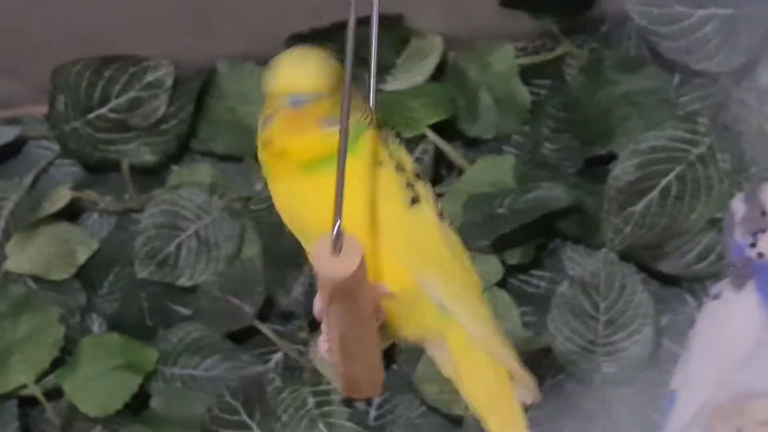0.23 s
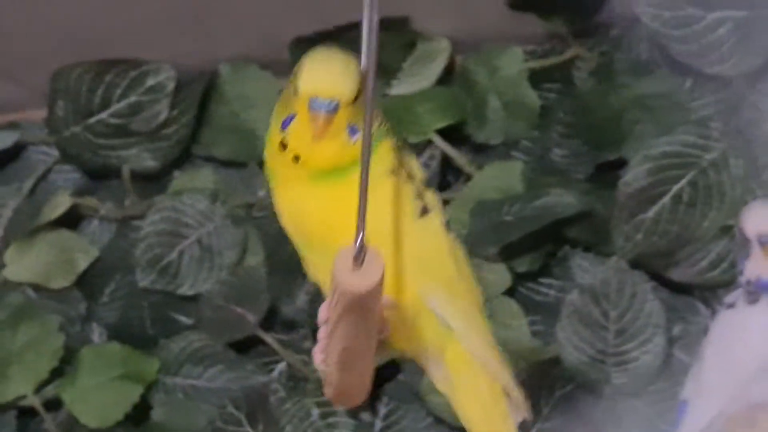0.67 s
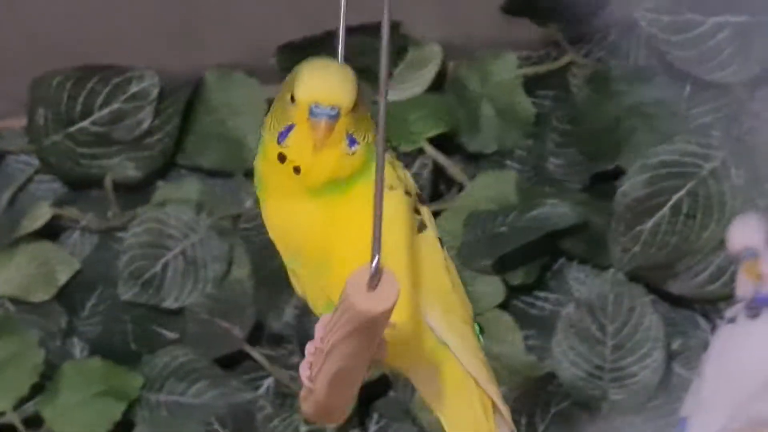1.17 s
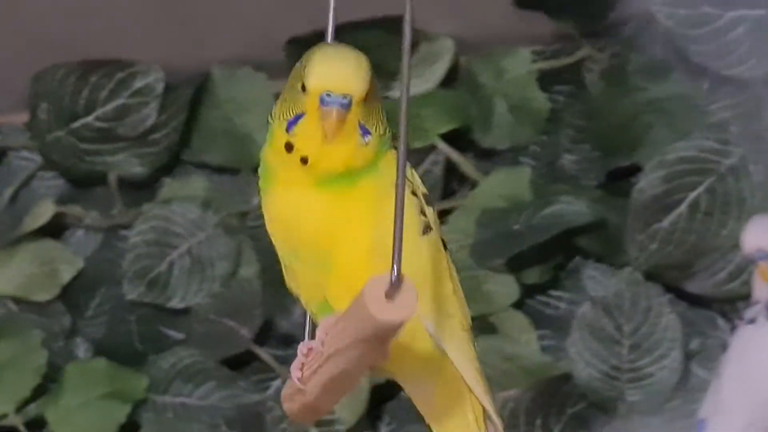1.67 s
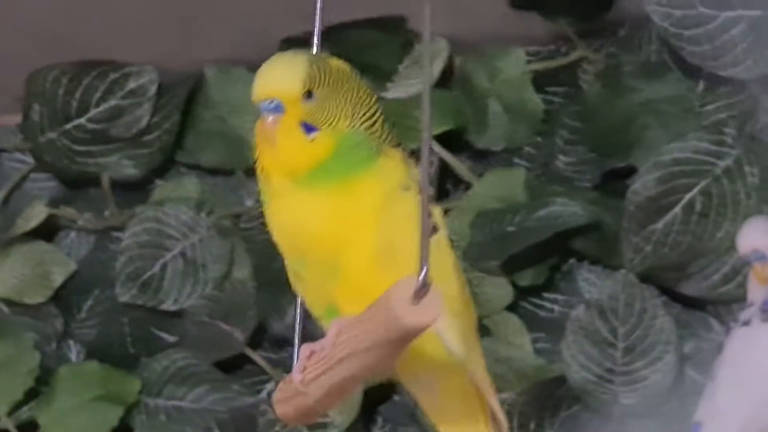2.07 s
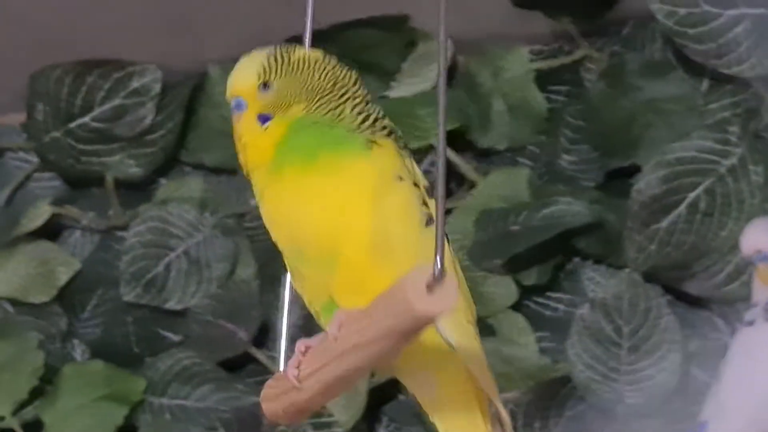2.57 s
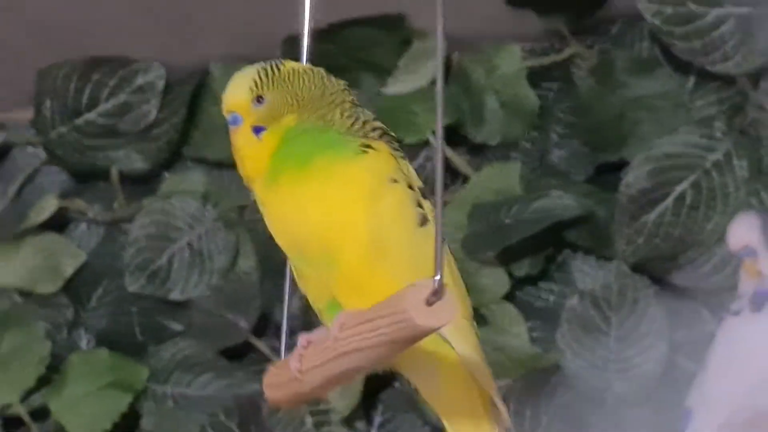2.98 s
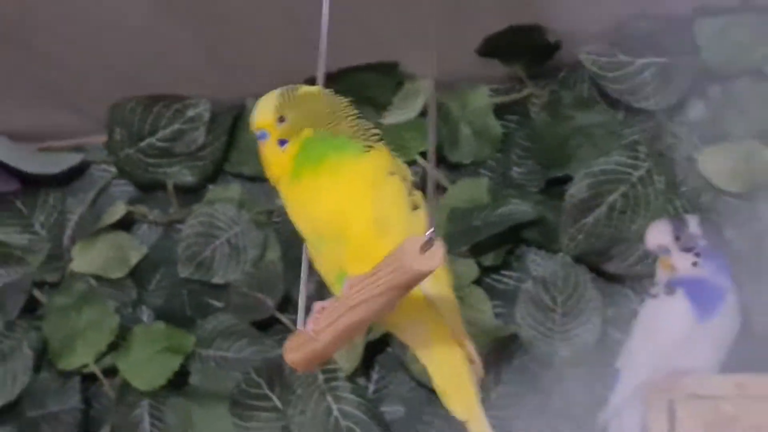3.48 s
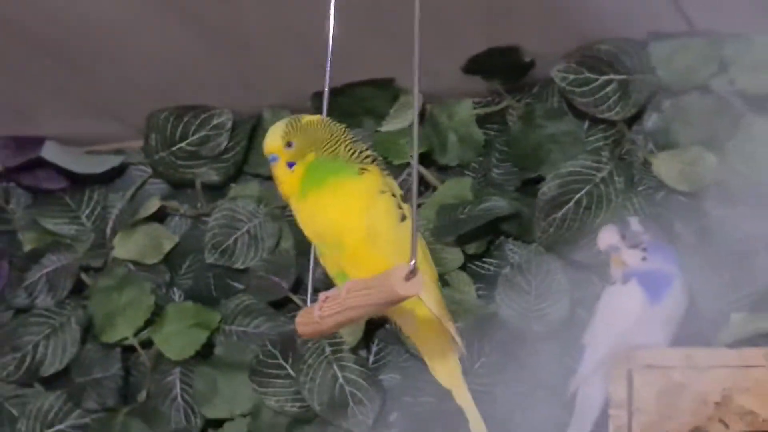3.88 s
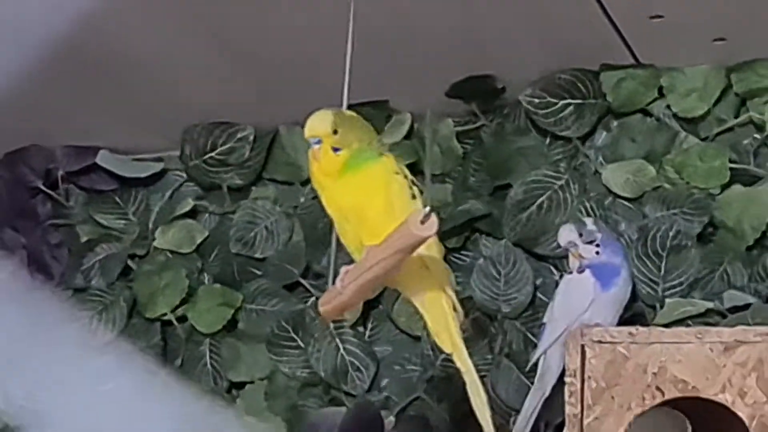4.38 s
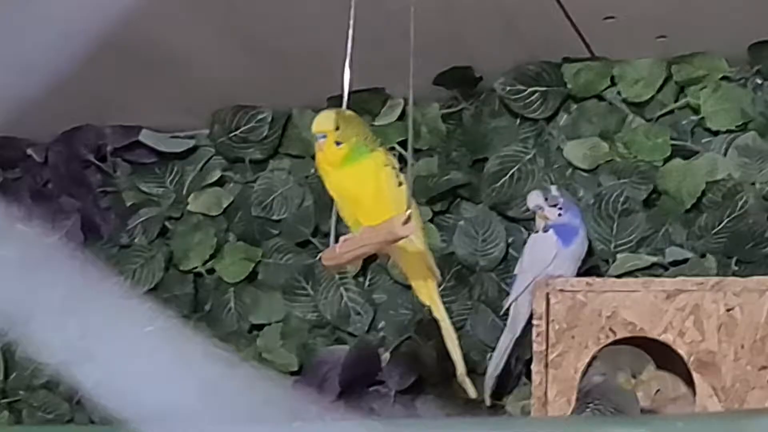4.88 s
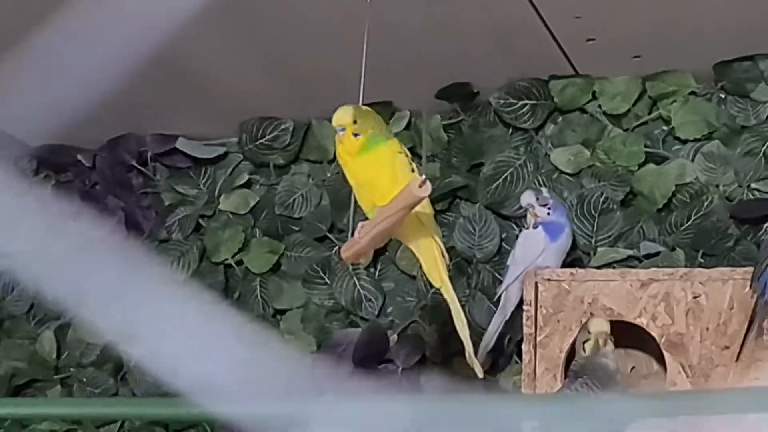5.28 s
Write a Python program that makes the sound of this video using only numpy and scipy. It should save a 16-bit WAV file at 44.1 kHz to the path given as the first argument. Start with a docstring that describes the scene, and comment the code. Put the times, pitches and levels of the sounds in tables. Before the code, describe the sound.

Budgies warble and rasp in short bursts, two piercing screeches standing out, over low hand thumps, faint hiss and feathery rustles.

```python
"""Parrots in a small aviary

Small parrots warble (gliding harmonic tones) and squawk (pulsed noise through throat resonances, with
whistles inside) in a small hard-walled aviary. Noise swells: feathers and feet brushing, a low puff
between squawks, a squawk's faint lingering hiss. A frame knock rings out, wire clinks. Handheld two-port
recorder: the right port hears the room; the covered left one gets mostly hand rumble and thumps."""
import sys
import numpy as np
from scipy import signal
from scipy.fft import rfft, irfft
from scipy.io import wavfile
from scipy.ndimage import uniform_filter1d, minimum_filter1d

SR = 44100
rng = np.random.default_rng(int(sys.argv[2]) if len(sys.argv) > 2 else 0)


def wrap_up_sound(samples):
    """Save the sound to the file named by the first command line argument, as 16-bit audio."""
    columns = np.atleast_2d(samples).T
    # keep every value between -1 and 1, then stretch to whole-number steps
    tamed = np.clip(columns, -1, 1)
    steps = np.round(tamed * 32767).astype(np.int16)
    wavfile.write(sys.argv[1], SR, steps)


N = 243873


def from_db(db):
    """Gain of a level in dB."""
    return 10 ** (np.asarray(db, float) / 20)


def rms_one(x):
    """Scale to rms 1."""
    return x / np.sqrt(np.mean(x ** 2) + 1e-20)


def in_time(rows):
    """Columns of a curve table at every sample."""
    time_s, *columns = np.transpose(rows)
    return [np.interp(np.arange(N) / SR, time_s, c) for c in columns]


def at_hz(points, hz, column=1):
    """A spectrum table read on a log-frequency axis."""
    points = np.array(points)
    return np.interp(np.log(hz + 1), np.log(points[:, 0]), points[:, column])


def band(x, low_hz, high_hz, order=2):
    """Butterworth band-pass."""
    return signal.sosfilt(signal.butter(order, [low_hz, high_hz], "band", fs=SR, output="sos"), x)


def drift(rate_hz):
    """Random drift of rms 1: noise twice through a one-pole low-pass."""
    r = np.exp(-2 * np.pi * rate_hz / SR)
    smooth = signal.lfilter([1], [1, -2 * r, r * r], rng.standard_normal(N + SR))
    return rms_one(smooth[SR:])   # skip the filter's start-up


def resonance(x, hz, width_hz):
    """Two-pole resonance with gain 1 on top."""
    r = np.exp(-np.pi * width_hz / SR)
    zeros = np.array([1, 0, -1]) * (1 - r * r) / 2
    return signal.lfilter(zeros, [1, -2 * r * np.cos(2 * np.pi * hz / SR), r * r], x)


# steady floor of each port, before the low cut: (frequency [Hz], level [dB per Hz])
LEFT_FLOOR = [(150, -100), (300, -104), (500, -108), (1000, -112), (2000, -114), (3500, -117), (5000, -122),
              (8000, -134), (10000, -128), (12000, -123), (15000, -123)]
RIGHT_FLOOR = [(150, -90.5), (300, -101), (500, -105), (1000, -110), (2000, -110), (3500, -115),
               (5000, -120), (8000, -124), (10000, -122), (12000, -120), (15000, -122)]


def hiss(spectrum):
    """Steady noise shaped to a level per Hz, with a low cut at 220 Hz."""
    hz = np.fft.rfftfreq(N, 1 / SR)
    low_cut = hz ** 2 / (hz ** 2 + 220. ** 2)
    gain = from_db(at_hz(spectrum, hz)) * np.sqrt(SR / 2) * low_cut
    return irfft(rfft(rng.standard_normal(N)) * gain, N)


def thump(contact_ms, hz, t60_s):
    """A push, rounded by the soft contact, after which the case swings back at its own low note; peak 1."""
    r, w = from_db(-60 / (t60_s * SR)), 2 * np.pi * hz / SR
    swing = signal.lfilter([1, -2, 1], [1, -2 * r * np.cos(w), r * r], np.ones(5000))
    pulse = signal.sosfilt(signal.butter(4, 1000 / contact_ms, fs=SR, output="sos"), swing)
    return pulse / np.abs(pulse).max()


# hand rumble in the case: (time [s], left level [dB], right level [dB])
RUMBLE_CURVE = [(0.0, -33.5, -41.5), (0.2, -45.5, -77), (0.33, -38, -47), (0.8, -41.5, -65),
                (1.0, -47, -60), (1.27, -40, -63), (1.46, -50, -65.5), (1.61, -42, -51.5),
                (1.8, -52.5, -73.5), (2.08, -39, -65.5), (2.24, -48.5, -68.5), (2.5, -36, -56.5),
                (2.9, -48, -62.5), (3.12, -44.5, -61.5), (3.5, -48.5, -67), (3.82, -39.5, -56),
                (4.2, -49.5, -70), (4.55, -43, -45), (4.95, -48.5, -61.5), (5.33, -44, -57),
                (5.53, -49, -60.5)]
# fingers shifting on the case:
# (time [s], peak [dB], push +1 or pull -1, port 0 left 1 right, contact [ms])
FINGER_THUMPS = [(0.227, -27, 1, 0, 4.3), (0.322, -28.5, -1, 0, 7), (0.349, -38, 1, 1, 1.7),
                 (0.351, -38, -1, 0, 6.5), (0.66, -19, 1, 0, 3.57), (0.677, -19.5, -1, 0, 8.3),
                 (0.752, -26, 1, 0, 11), (0.873, -48, 1, 1, 2.5), (1.103, -24.5, -1, 0, 5.8),
                 (1.593, -23.5, 1, 0, 9.2), (1.92, -20, -1, 0, 2.74), (2.058, -34, -1, 0, 4.8),
                 (2.065, -27.5, 1, 0, 11.3), (2.462, -27.5, 1, 0, 15.4), (2.541, -43.5, -1, 0, 2.7),
                 (2.575, -43.5, -1, 0, 3.5), (2.618, -34.5, 1, 0, 5), (2.652, -19.5, 1, 0, 5),
                 (2.685, -35, -1, 0, 3.6), (2.743, -22.5, 1, 0, 3.9), (2.87, -46, -1, 1, 2.47),
                 (2.996, -41, -1, 0, 5.5), (3.029, -25.5, -1, 0, 4.5), (3.056, -16, 1, 0, 4),
                 (3.088, -27.5, 1, 0, 4.3), (3.099, -34, 1, 0, 4.2), (3.121, -24.5, -1, 0, 3.8),
                 (3.335, -43, 1, 0, 3.7), (3.471, -37, -1, 0, 5.9), (3.678, -32.5, 1, 0, 3.2),
                 (3.775, -36.5, 1, 0, 2.2), (3.91, -55, -1, 1, 3.4), (3.92, -32, 1, 0, 6.2),
                 (3.964, -38, 1, 0, 5.1), (4.186, -50, -1, 1, 2.75), (4.342, -37.5, -1, 0, 5.2),
                 (4.367, -45, 1, 0, 5), (4.435, -38, 1, 0, 2.8), (4.541, -33, 1, 0, 2.7),
                 (4.541, -30, -1, 1, 2), (4.746, -45.5, 1, 1, 2.3), (4.833, -34.5, 1, 0, 5.5),
                 (5.068, -33.5, -1, 0, 3.91), (5.259, -38.5, -1, 1, 3.8), (5.367, -39, -1, 1, 2),
                 (5.506, -55, -1, 1, 2.5)]
# swing behind each port: (frequency [Hz], t60 [s])
CASE_SWING = [(65, .07), (170, 0.014)]


def hand():
    """Lumpy rumble of its own in each port, a scatter of faint knocks, and single thumps."""
    knocks_per_s, knock_db = 14, -13
    out = np.zeros((2, N))
    for port, (level_db, top_hz) in enumerate(zip(in_time(RUMBLE_CURVE), (72, 110))):
        deep = signal.sosfilt(signal.butter(4 - 2 * port, top_hz, fs=SR, output="sos"), rng.standard_normal(N))
        deep = signal.sosfilt(signal.butter(1, 25, "high", fs=SR, output="sos"), deep)
        lumpy = rms_one(deep) * from_db(0.83 * drift(3.8))
        strikes = (rng.random(N) < knocks_per_s / SR) * rng.standard_normal(N)
        contact_ms = 5.5 - 5.4 * port
        knocks = signal.fftconvolve(strikes, thump(contact_ms, *CASE_SWING[port]))[:N]
        out[port] = from_db(level_db) * (lumpy + from_db(knock_db) * knocks)
    for time_s, peak_db, push, port, contact_ms in FINGER_THUMPS:
        i, port = round(time_s * SR), round(port)
        pulse = thump(contact_ms, *CASE_SWING[port])[:N - i]
        out[port, i:i + len(pulse)] += np.sign(push) * from_db(peak_db) * pulse
    return out


# modes of the wooden frame, already ringing at the start:
# (frequency [Hz], mean level at 0 s [dB], t60 [s])
FRAME_MODES = [(87.3, -36, 0.52), (364, -43, 0.46), (476, -40, 0.28), (585, -43.5, 0.24)]


def knock():
    """Each mode of the frame dies away with a wavering level."""
    t = np.arange(N) / SR
    out = np.zeros(N)
    for hz, level_db, t60_s in FRAME_MODES:
        fall_db = level_db - 60 * t / t60_s + 4.7 * drift(31)
        out += from_db(fall_db) * np.sin(2 * np.pi * (hz * t + rng.random()))
    return out


# noise swells in the open port, before flutter: (peak time [s], fade before the band's share [dB/s],
# peak of the dull [dB], middle [dB], bright [dB] and airy [dB] bands)
SWELLS = [(0.013, 96, -60, -53, -55, -55.5), (0.04, 199, -48.5, -66, -59, -62),
          (0.075, 250, -63, -73, -57.5, -54), (0.13, 150, -78, -77, -59.5, -59),
          (0.202, 148, -53, -56, -59.5, -56), (0.233, 131, -46.5, -54.5, -61, -56.5),
          (1.65, 59.8, -84, -75.5, -65, -80), (2.15, 59.7, -77, -65, -76, -91),
          (2.298, 80, -52.5, -57, -64, -70), (2.9, 29.9, -74, -75, -86.5, -92),
          (3.095, 150, -73, -72, -71, -74), (3.245, 101, -68.5, -57.5, -69, -67),
          (3.898, 116, -55.5, -47, -68.5, -70), (3.95, 114, -59, -65, -80.5, -88),
          (4.29, 60.7, -68.5, -63, -72.5, -86.5), (4.419, 115, -46.5, -48.5, -57, -57),
          (4.545, 150, -47.5, -62.5, -58.5, -65), (4.6, 81, -56, -71.5, -71, -79.5),
          (4.66, 109, -56, -54, -58.5, -68), (4.75, 81, -60.5, -63, -72, -87.5),
          (4.87, 40, -64, -65, -66, -84), (4.925, 120.5, -60.5, -56, -59.5, -68),
          (5.0, 80, -58.5, -66.5, -69, -80), (5.05, 30, -65, -62, -69.5, -75),
          (5.2, 60, -66.5, -53, -77, -74), (5.3, 150, -73, -51, -76, -79),
          (5.41, 60, -61.5, -54.5, -63.5, -81), (5.47, 40, -52, -50, -61.5, -61),
          (5.51, 60.4, -52.5, -56, -61, -59)]
# noise bands: (low edge [Hz], high edge [Hz])
SWELL_EDGES = [(180, 795), (800, 2700), (4300, 9500), (9500, 14000)]
# hollow tone in each band: (frequency [Hz], width [Hz], gain [dB])
HOLLOW_TONES = [(374, 90, 1.5), (1270, 300, 1.5), (5200, 440, -0.5), (11900, 980, 1.5)]
# faint noise between the swells, one per band: level [dB]
REST_DB = [-79, -88, -95, -97]
RISE_DB_PER_S, FADE_SHARE = 700.5, [.7, 1.05, 1.5, 1.9]   # treble fades fastest


def noise_swells():
    """Feathers and feet, a low puff, a squawk's lingering hiss: four fluttering bands with hollow tones."""
    flutter, out, t = drift(35), np.zeros(N), np.arange(N) / SR
    for k, ((low_hz, high_hz), (hz, width_hz, tone_db)) in enumerate(zip(SWELL_EDGES, HOLLOW_TONES)):
        noise = band(rng.standard_normal(N), low_hz, high_hz, order=3)
        noise = rms_one(noise + from_db(tone_db) * resonance(noise, hz, width_hz))
        power = from_db(REST_DB[k]) ** 2
        for peak_s, fade_db_per_s, *band_db in SWELLS:
            slope = np.where(t < peak_s, RISE_DB_PER_S, -fade_db_per_s * FADE_SHARE[k])
            power = power + from_db(band_db[k] + slope * (t - peak_s)) ** 2
        flutter_db = 1.0 * flutter + 1.5 * drift(30)   # shared + the band's own
        out += noise * np.sqrt(power) * from_db(flutter_db)
    return out


# warbled notes, and the whistles heard inside squawks:
# (start [s], length [s], first pitch before scoop [Hz], last pitch [Hz], roughness [0-1],
# whistle level before throb [dB], second-harmonic level before throb and beak [dB])
PITCHED_NOTES = [(0.53, 0.043, 3800, 3100, 0.55, -50, -56), (0.561, 0.021, 1520, 1270, 0.06, -46.5, -48),
                 (0.588, 0.018, 1794, 1690, 0.13, -41.5, -58), (0.602, 0.069, 3438, 2390, 0.43, -36, -51),
                 (0.618, 0.026, 2584, 2316, 0.2, -38.5, -48), (0.645, 0.056, 2017, 1867, 0.65, -37, -64),
                 (0.721, 0.016, 1293, 1526, 0.22, -38, -50), (0.755, 0.022, 3030, 2864, 0, -46, -64),
                 (0.77, 0.014, 2650, 2455, 0.26, -44, -62), (0.792, 0.012, 1846, 1710, 0, -38, -59),
                 (0.815, 0.012, 1260, 1340, 0.24, -47, -63), (1.003, 0.033, 3274, 2950, 0.3, -52.5, -61),
                 (1.039, 0.0084, 1450, 1490, 0.3, -51.5, -74),
                 (1.056, 0.058, 2540, 2144, 0.37, -47.5, -52.5), (1.156, 0.039, 3084, 3000, 0.34, -46, -60),
                 (1.177, 0.0094, 1514, 1555, 0.1, -45.5, -61), (1.196, 0.019, 2380, 1685, 0.05, -45.5, -59),
                 (1.223, 0.014, 3420, 3400, 0.4, -44.5, -59), (1.231, 0.025, 2650, 2630, 0.44, -41, -59),
                 (1.253, 0.043, 3200, 2940, 0.38, -42, -56.5), (1.267, 0.013, 1580, 1560, 0, -50.5, -60),
                 (1.276, 0.033, 3340, 3730, 0.58, -50, -58), (1.384, 0.04, 3230, 3136, 0.35, -35, -41.5),
                 (1.402, 0.0085, 1760, 1560, 0.4, -42.5, -27), (1.449, 0.064, 5227, 5568, 0.75, -26, -45),
                 (2.217, 0.042, 2898, 2954, 0.62, -29.5, -40),
                 (2.222, 0.049, 5814, 5863, 0.48, -15.5, -16.5), (2.224, 0.039, 3473, 3510, 0.47, -24, -14),
                 (2.334, 0.056, 2923, 3041, 0.56, -33.5, -34), (2.335, 0.055, 5810, 5940, 0.48, -21, -18),
                 (2.971, 0.049, 1080, 1242, 0.34, -68.5, -84.5),
                 (3.195, 0.019, 1066, 1160, 0.27, -65.5, -82), (3.245, 0.031, 1128, 1154, 0.15, -64, -78.5),
                 (3.397, 0.017, 5000, 3230, 0.4, -52.5, -58), (3.411, 0.034, 3260, 2926, 0.38, -49.5, -47),
                 (3.441, 0.014, 1904, 1606, 0.2, -48.5, -43.5),
                 (3.457, 0.056, 2556, 2130, 0.38, -38, -50.5), (3.56, 0.0077, 5350, 3480, 0.3, -43, -79),
                 (3.563, 0.024, 3630, 3540, 0.07, -37.5, -67), (3.577, 0.012, 2920, 2890, 0.2, -38, -56.5),
                 (3.586, 0.0097, 1490, 1420, 0.03, -44, -49), (3.63, 0.029, 3295, 3594, 0.4, -35, -63),
                 (3.647, 0.032, 3116, 3032, 0.37, -31.5, -35.5), (3.647, 0.011, 2520, 2450, 0.5, -33, -36),
                 (3.681, 0.014, 2060, 2120, 0.32, -35.5, -52), (3.697, 0.024, 2960, 3036, 0.5, -28.5, -48),
                 (3.691, 0.011, 1717, 1520, 0.1, -40, -49), (3.734, 0.018, 2015, 1980, 0.42, -37.5, -55),
                 (3.75, 0.035, 2836, 2883, 0.47, -26.5, -38), (3.775, 0.036, 3300, 3155, 0.55, -32.5, -50),
                 (4.319, 0.046, 3700, 3145, 0.32, -48, -51.5),
                 (4.367, 0.023, 4020, 3670, 0.18, -47.5, -52.5), (4.382, 0.022, 1914, 1400, 0.42, -44, -53),
                 (4.406, 0.033, 2980, 2675, 0.46, -43.5, -57.5),
                 (4.44, 0.034, 2415, 2074, 0.78, -47, -56.5), (4.852, 0.093, 1218, 1085, 0.23, -54, -66.5),
                 (4.944, 0.039, 1444, 1392, 0.12, -55.5, -72), (5.058, 0.064, 1358, 990, 0.37, -53, -73),
                 (5.089, 0.037, 2177, 1810, 0.33, -58, -71), (5.142, 0.024, 3900, 3110, 0.2, -48, -53.5),
                 (5.17, 0.0072, 1490, 1650, 0.3, -44.5, -51.5), (5.182, 0.018, 2800, 2870, 0.15, -53, -73),
                 (5.203, 0.033, 4130, 2913, 0.31, -44.5, -60), (5.225, 0.014, 1644, 1540, 0.3, -48, -57.5),
                 (5.239, 0.065, 2207, 1876, 0.95, -48.5, -66), (5.241, 0.019, 3010, 2960, 0.02, -44.5, -56),
                 (5.271, 0.015, 1373, 1300, 0.36, -41.5, -48), (5.316, 0.074, 1500, 1184, 0.25, -45.5, -64),
                 (5.383, 0.051, 1694, 1591, 0.37, -50, -60), (5.4, 0.033, 1190, 1235, 0.4, -51, -71),
                 (5.426, 0.054, 1920, 1915, 0.25, -52.5, -65), (5.454, 0.026, 2910, 2920, 0.26, -50.5, -73)]
# how the open beak colours the overtones: (frequency [Hz], gain [dB])
BEAK_GAIN = [(2500, 2), (4000, -3), (5500, -1), (7500, -2.5), (9300, 5.5), (11000, 1), (12500, -2.5),
             (15000, -12)]
PIVOT_HZ = 3000
OVERTONE_FALL_DB, LOW_NOTE_FALL_DB = 5.5, 2   # per further overtone; extra per octave under PIVOT_HZ


def pitched_notes():
    """Gliding whistles with three overtones; a rough note wobbles in pitch and throbs in level."""
    out, wobble, throb = np.zeros(N), np.tanh(drift(275)), np.tanh(drift(130))
    for start_s, length_s, first_hz, last_hz, rough, whistle_db, overtone_db in PITCHED_NOTES:
        i, n = round(start_s * SR), round(length_s * SR)
        u = np.arange(n) / n
        scoop = 1 + .13 * np.exp(-np.arange(n) / SR / .003)   # every note drops in from above
        glide_hz = first_hz * (last_hz / first_hz) ** u
        hz = glide_hz * scoop * (1 + .16 * rough * wobble[i:i + n])
        phase = 2 * np.pi * np.cumsum(hz) / SR
        shape = np.minimum(1, np.minimum(u / 0.24, (1 - u) / 0.15))
        shape = shape * from_db(13.5 * rough * throb[i:i + n])
        fall_db = OVERTONE_FALL_DB + LOW_NOTE_FALL_DB * np.maximum(0, np.log2(PIVOT_HZ / hz))
        tone = from_db(whistle_db) * np.sin(phase)
        for k in range(2, 5):
            level_db = overtone_db - fall_db * (k - 2) + at_hz(BEAK_GAIN, k * hz)
            tone += from_db(level_db) * np.sin(k * phase) * (k * hz < .45 * SR)   # no aliasing
        out[i:i + n] += np.sqrt(2) * shape * tone
    return out


# rasp of squawks and hoarse phrases; a row ending before its start is silent:
# (start [s], peak [s], end [s], level under the peak at the start [dB], at the end [dB], darkening [dB],
# peak level before flare of the deep [dB], low [dB], middle [dB] and high [dB] throat bands)
SQUAWK_CALLS = [(0.535, 0.567, 0.57, 9, 1.7, 24, -46.5, -58, -54.5, -97),
                (0.597, 0.688, 0.71, 7.8, 28, 22, -44.5, -45, -51, -68.5),
                (0.752, 0.768, 0.77, 4, 27, 26, -63, -71, -52.5, -107),
                (0.999, 1.02, 1.073, 3, 3, -4, -78.5, -57.5, -56.5, -64),
                (1.045, 1.07, 1.098, 4, 10, 23, -56.5, -68, -54.5, -58),
                (1.145, 1.158, 1.23, 2, 22, -2, -67, -51.5, -63, -106),
                (1.232, 1.298, 1.343, 24, 33, -1.5, -50, -43, -49.5, -69),
                (1.375, 1.396, 1.4, 3.4, 4, 9, -52, -37, -36, -45),
                (1.413, 1.472, 1.547, 12.3, 22.3, -9, -39, -28.5, -28, -34),
                (2.212, 2.241, 2.31, 12, 16.2, -2.5, -46, -25.5, -15.5, -18.5),
                (2.328, 2.35, 2.425, 3, 10, 2, -51.5, -27, -15, -20),
                (3.397, 3.449, 3.522, 14, 21, 31, -60, -49, -54, -49),
                (3.54, 3.603, 3.71, 6, 5.3, 34.5, -60, -49.5, -68, -82),
                (3.643, 3.66, 3.57, 7.2, 6, 17.5, -58, -45, -41, -47.5),
                (3.702, 3.801, 3.83, 9, 12, -1.5, -55.5, -31, -37.5, -43.5),
                (4.312, 4.34, 4.42, 4, 3, -1, -76, -58.5, -66.5, -60.5),
                (4.397, 4.455, 4.49, 7.1, 12, 4, -55, -55.5, -60, -59),
                (5.127, 5.16, 5.21, 3, 3, -0.5, -64, -66, -63, -65),
                (5.21, 5.293, 5.35, 12, 28, 15, -43, -49.5, -47.5, -55.5)]
# throat resonances, one list per band: (frequency [Hz], first-pass width [Hz], relative gain [dB])
THROAT_MODES = [
    [(1250, 350, -3.5), (1900, 980, 6), (2310, 440, -3.5)],
    [(2930, 440, 0.5), (3420, 450, -0.5), (4090, 620, -1)],
    [(4800, 510, 0), (5920, 650, -0.5), (7080, 700, -3), (7900, 700, -4)],
    [(9300, 2500, 5), (11600, 1600, 7.5), (13500, 3600, 0.5), (15200, 1200, -18)],
]
PULSE_HZ, PULSE_JITTER, PUFF_FADE_PER_TURN, SLAP_DB = 230.4, .25, 1.6, -11
ONSET_S = .005   # the rasp takes hold this long after a call starts


def squawks():
    """The voice membranes open unevenly; each puff of turbulent air rings the throat resonances."""
    turns = np.cumsum(PULSE_HZ * (1 + PULSE_JITTER * np.clip(drift(90), -2, 2))) / SR
    slaps = (np.diff(np.floor(turns), prepend=0) > 0) * from_db(3.5 * rng.standard_normal(N))
    puffs = np.exp(-PUFF_FADE_PER_TURN * (turns % 1)) * rng.standard_normal(N)
    source = from_db(SLAP_DB) * rms_one(slaps) + rms_one(puffs)
    rings = []
    for modes in THROAT_MODES:
        ring = np.zeros(N)
        for k, (hz, width_hz, gain_db) in enumerate(modes):
            twice = resonance(resonance(source, hz, width_hz), hz, 2.3 * width_hz)
            ring += from_db(gain_db) * twice * (-1) ** k   # neighbours in opposite phase
        rings.append(rms_one(ring) * from_db(2.5 * drift(45)))   # the bands flare up unevenly
    out, t = np.zeros(N), np.arange(N) / SR
    leans = np.linspace(1, -1, len(rings))   # darkening lifts the deep bands and lowers the high ones
    for start, peak, end, entry_db, exit_db, darken_db, *band_db in SQUAWK_CALLS:
        gate = uniform_filter1d(1. * (t > start + ONSET_S) * (t < end), size=420)
        swell_db = np.interp(t, [start, peak, end], [-entry_db, 0, -exit_db])
        tilt_db = darken_db * (np.clip(t, start, end) - peak) / (end - start)
        for db, lean, ring in zip(band_db, leans, rings):
            out += gate * from_db(db + swell_db + lean * tilt_db) * ring
    return out


# aviary reverberation: (frequency [Hz], t60 [s], level before tail scaling [dB])
ROOM_DECAY = [(500, 0.22, -6), (1500, 0.42, -3), (2990, 0.2, 0.5), (5630, 0.19, 2.5), (8880, 0.17, 0.5),
              (13830, 0.11, 4.5)]
TAIL_BEND, LATE_DB, LATE_T60_S = 0.65, -59, 0.54


def room(x):
    """Uneven reflections dying band by band, fast then slower, over a very faint, longer tail."""
    t = np.arange(SR) / SR
    edges_hz = 380 * 2 ** np.arange(0, 6, .5)
    white = rng.standard_normal((2, SR))
    white = white * np.abs(white) ** 2.0   # a few strong echoes stand out of the many weak ones
    tail = np.zeros(SR)
    for k, (low_hz, high_hz) in enumerate(zip(edges_hz, edges_hz[1:])):
        hz = np.sqrt(low_hz * high_hz)
        early = from_db(-60 * (t / at_hz(ROOM_DECAY, hz)) ** TAIL_BEND)
        late = from_db(LATE_DB - 60 * t / LATE_T60_S)
        level = from_db(at_hz(ROOM_DECAY, hz, column=2))
        tail += band(white[k % 2], low_hz, high_hz) * (early + late) * level
    tail *= np.clip((t - .002) / .004, 0, 1)   # the first wall answers after a few ms
    return signal.fftconvolve(x, tail / np.sqrt(np.sum(tail ** 2)))[:N]


# clinks of the swing's wire: (time [s], drive level before the 12 dB trim [dB])
WIRE_CLINKS = [(3.086, -50), (3.237, -44.5), (4.655, -58), (4.918, -53)]
# modes of the wire: (frequency [Hz], mean level [dB], t60 [s])
WIRE_MODES = [(5420, -12, .1), (7090, -9.5, .12), (8100, -10, .14), (9020, -6.5, .1), (9300, -6, 0.15),
              (9870, -11, .1), (11400, -9, 0.078), (11680, -1.5, .09), (12300, -11, .08), (13090, 1, .08)]


def clinks():
    """Each clink is a short scrape that strikes every mode of the wire with a strength of its own."""
    out, t = np.zeros(N), np.arange(SR // 4) / SR
    for time_s, drive_db in WIRE_CLINKS:
        i = round(time_s * SR)
        ring = np.zeros(len(t))
        for hz, level_db, t60_s in WIRE_MODES:
            fall_db = level_db + 5.5 * rng.standard_normal() - 60 * t / t60_s
            ring += from_db(fall_db) * np.sin(2 * np.pi * hz * t)
        scrape = rng.standard_normal(1500) * np.exp(-np.arange(1500) / 500.)
        scrape = rms_one(scrape) / np.sqrt(1500)   # unit energy
        out[i:i + len(t)] += from_db(drive_db - 12) * signal.fftconvolve(ring, scrape)[:len(t)]
    return out


def scene():
    """Birds, clinks, swells and knock reach the open port; a trace of echo leaks into the covered one."""
    room_db, leak_db = -4, -66
    calls = pitched_notes() + squawks() + clinks()
    right = calls + from_db(room_db) * room(calls) + noise_swells() + knock() + hiss(RIGHT_FLOOR)
    left = from_db(leak_db) * room(calls) + hiss(LEFT_FLOOR)
    return hand() + np.array([left, right])


def record(dry):
    """A limiter per port ducks around peaks above 0.93; a steep low-pass cuts the top."""
    cutoff_hz = 16150
    headroom = minimum_filter1d(.93 / np.maximum(np.abs(dry), .93), size=400)
    gain = uniform_filter1d(headroom, size=200)
    return signal.sosfilt(signal.cheby2(20, 80, cutoff_hz, fs=SR, output="sos"), gain * dry)


dry = scene()
out = record(dry)
wrap_up_sound(out)
```